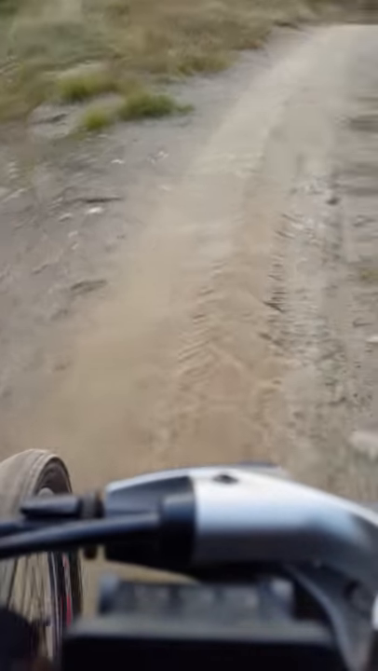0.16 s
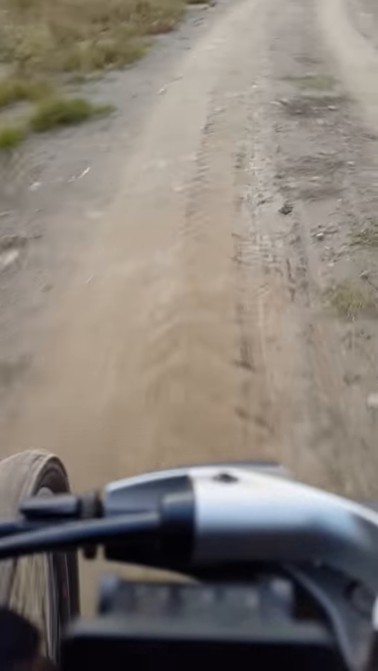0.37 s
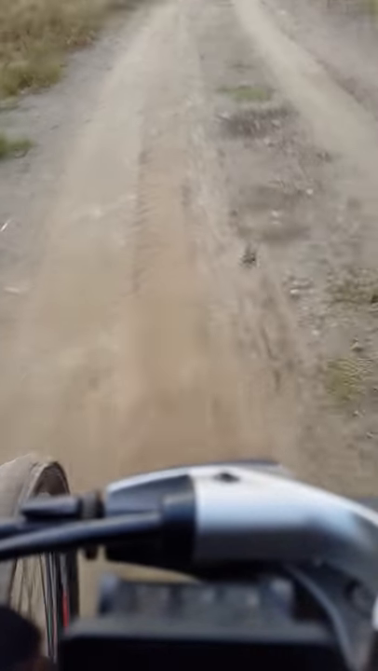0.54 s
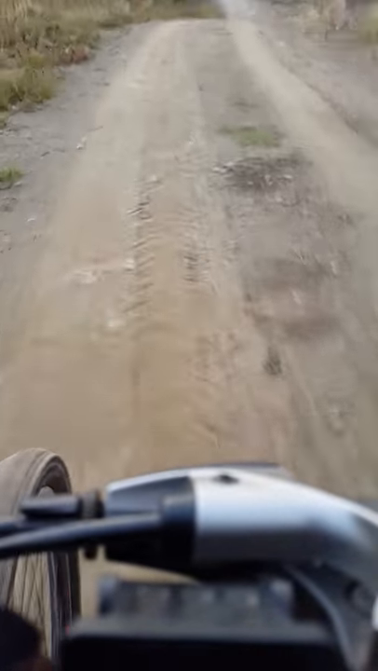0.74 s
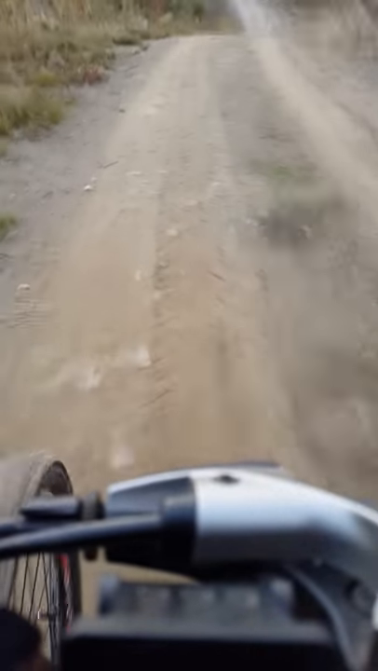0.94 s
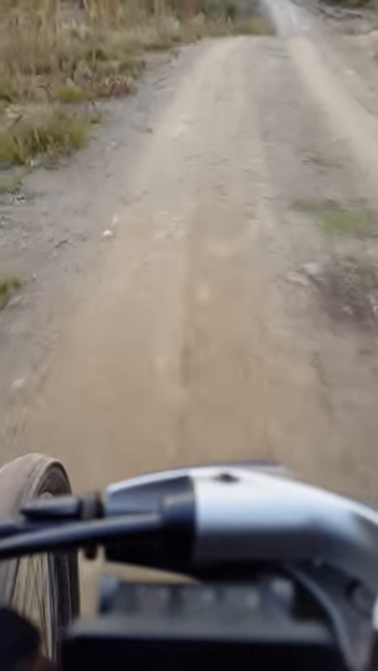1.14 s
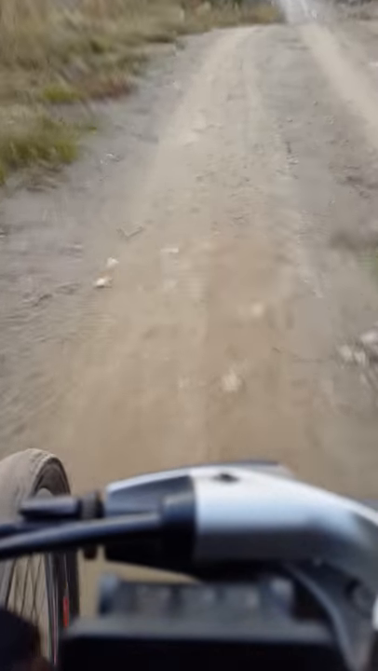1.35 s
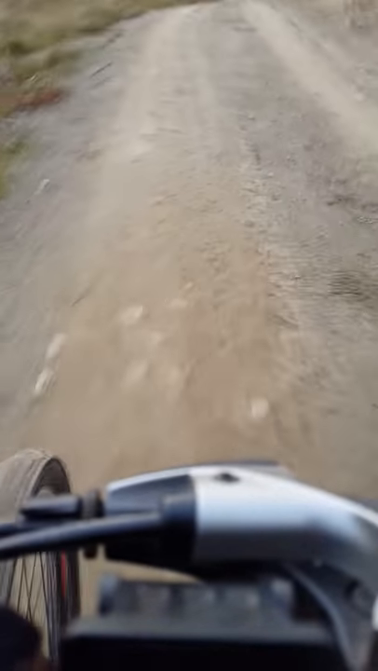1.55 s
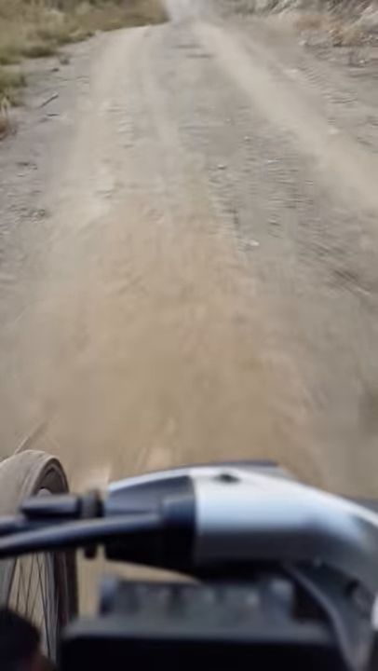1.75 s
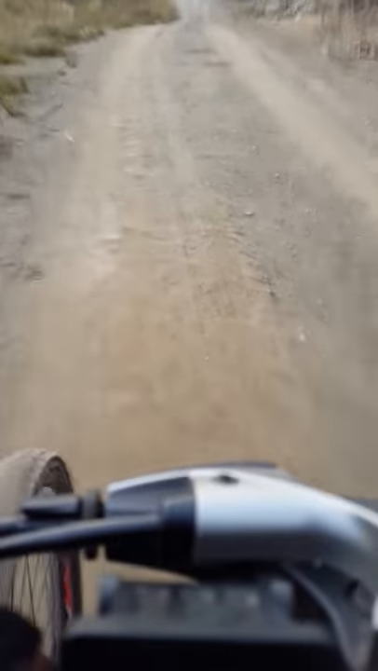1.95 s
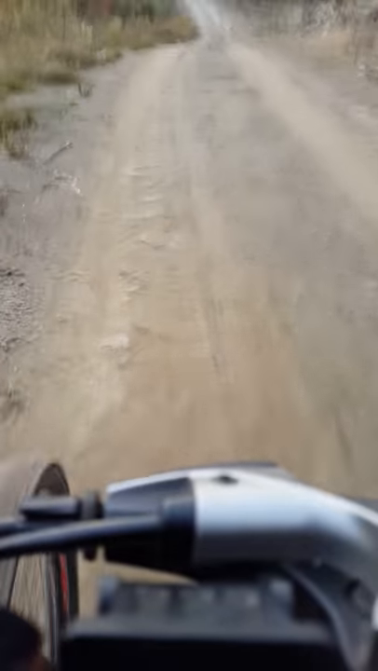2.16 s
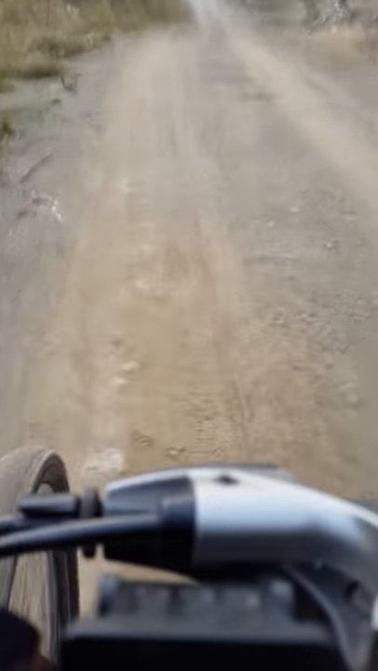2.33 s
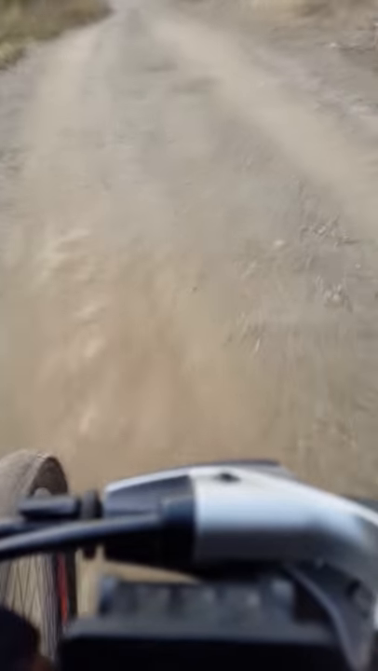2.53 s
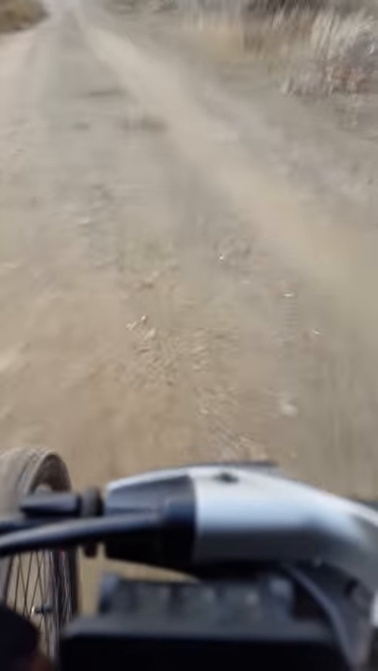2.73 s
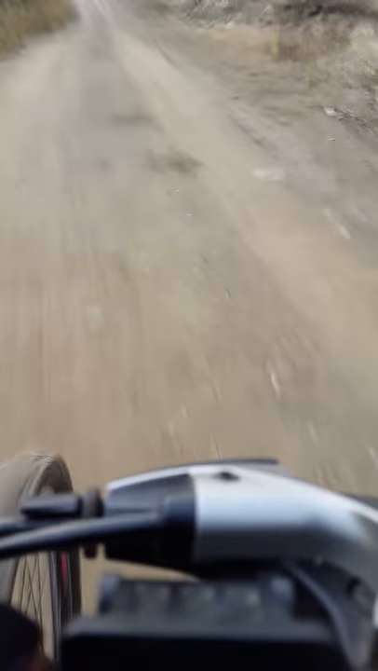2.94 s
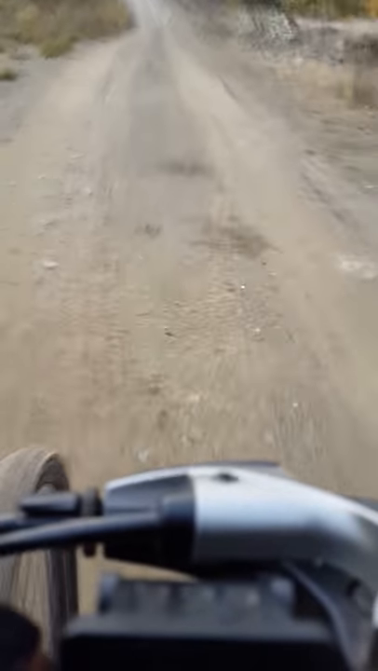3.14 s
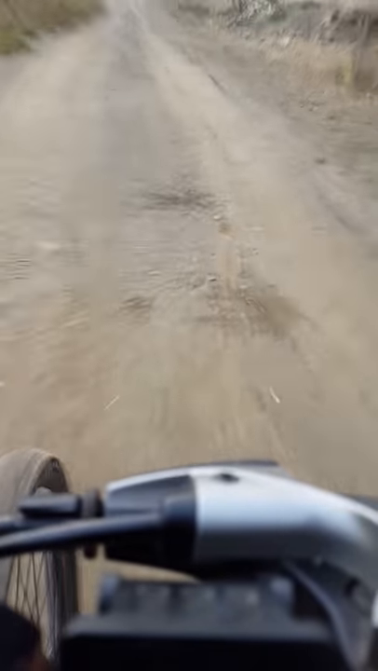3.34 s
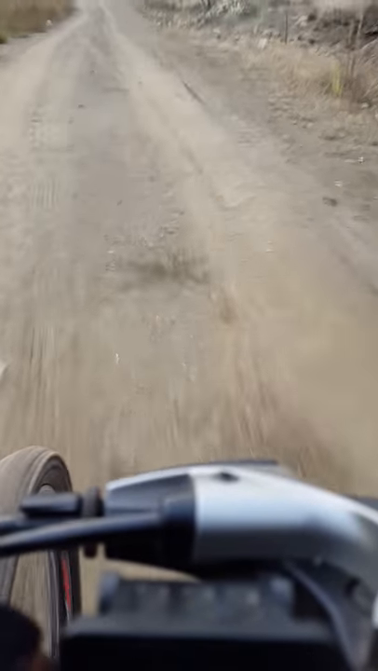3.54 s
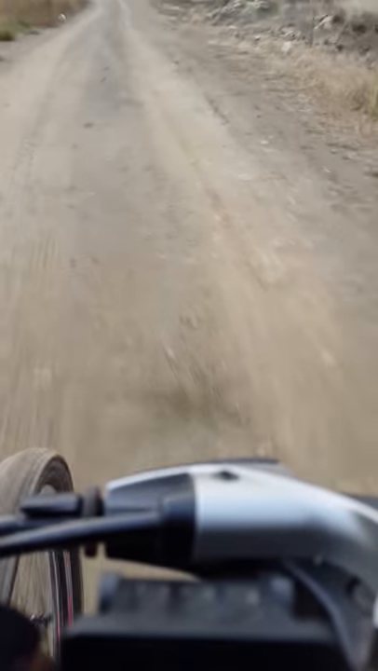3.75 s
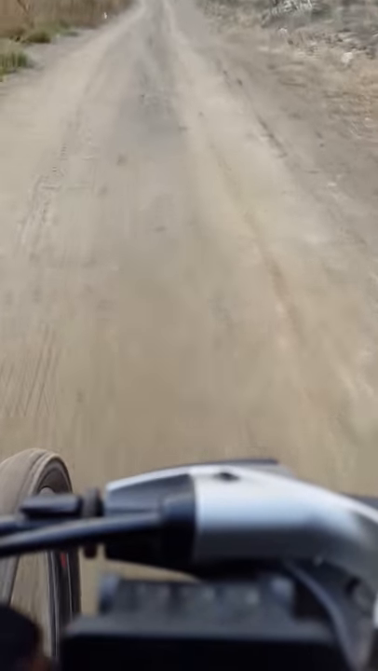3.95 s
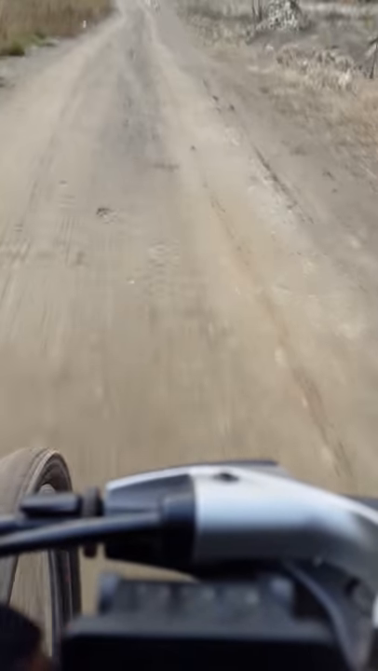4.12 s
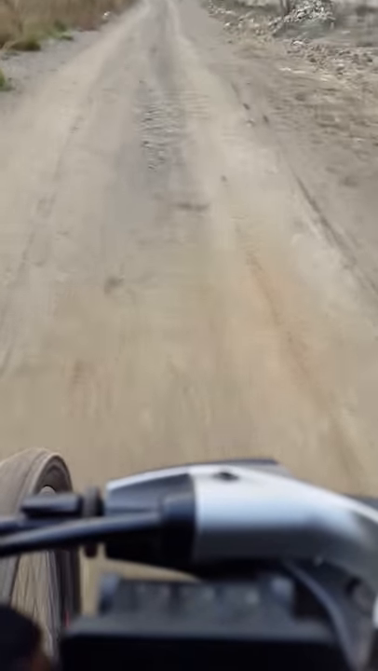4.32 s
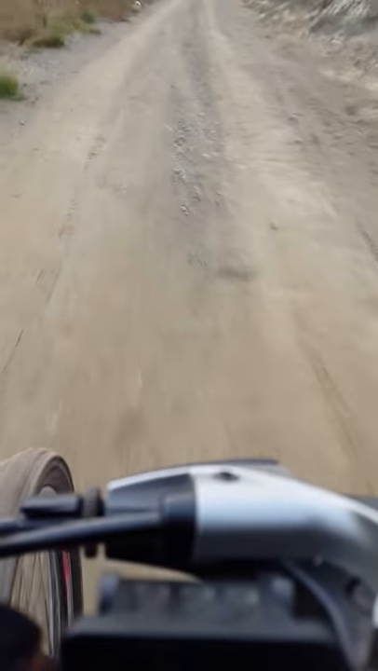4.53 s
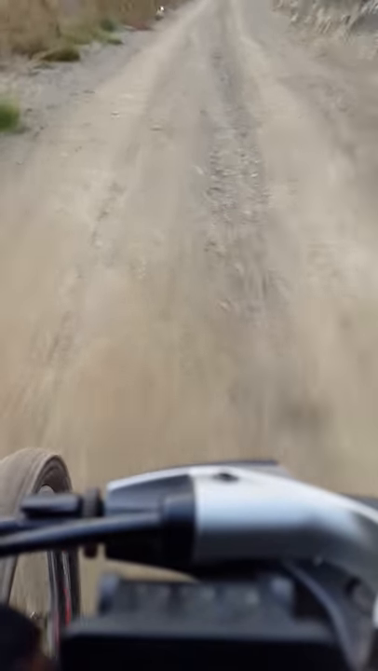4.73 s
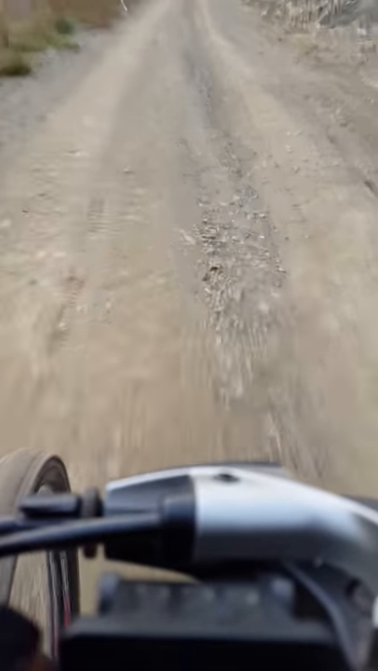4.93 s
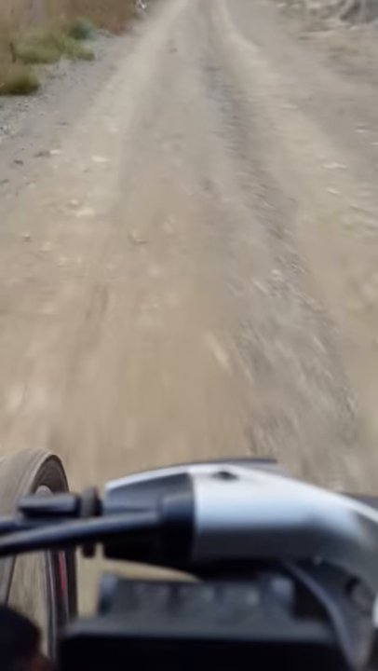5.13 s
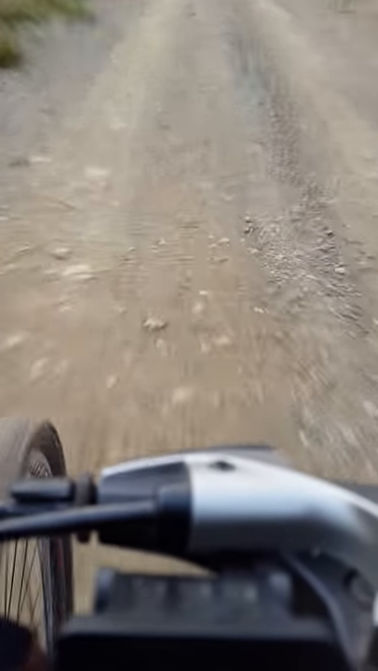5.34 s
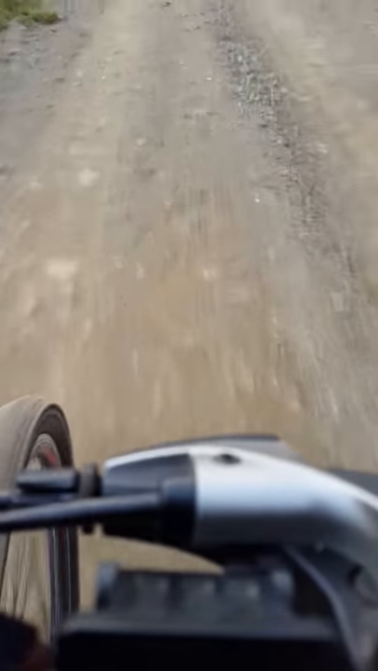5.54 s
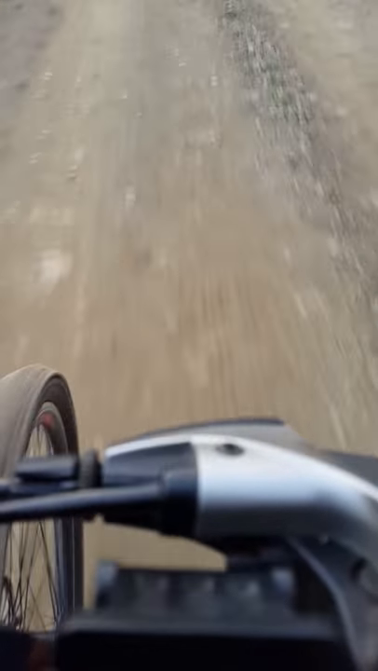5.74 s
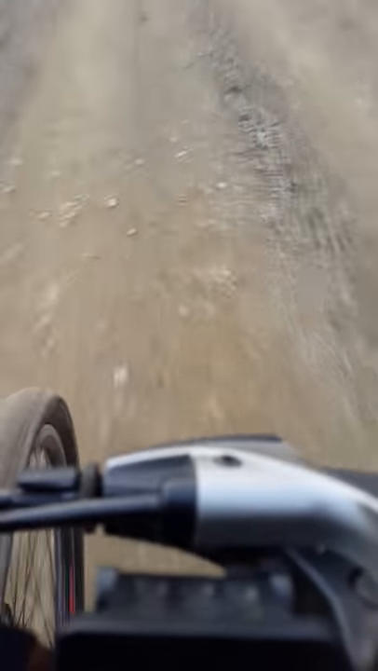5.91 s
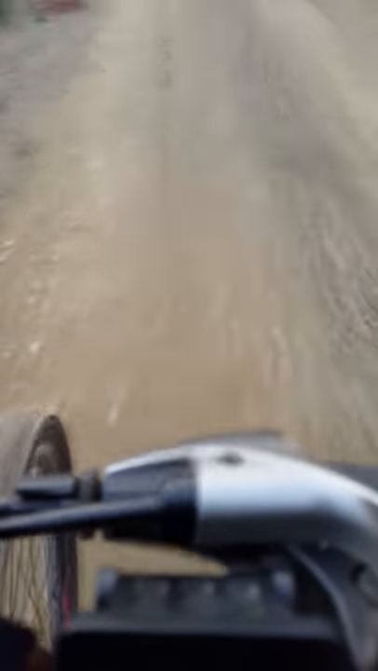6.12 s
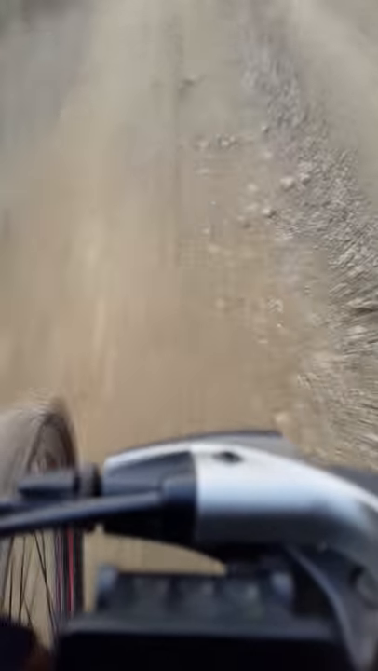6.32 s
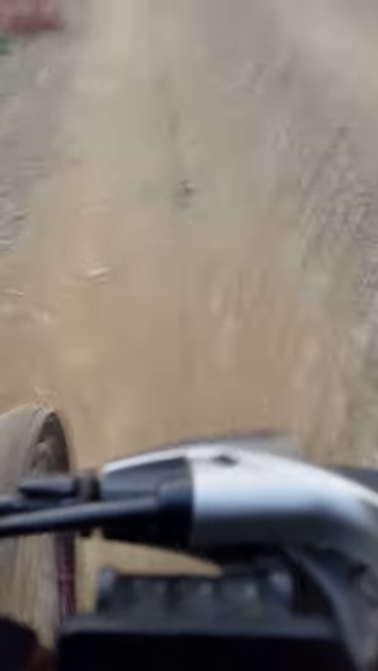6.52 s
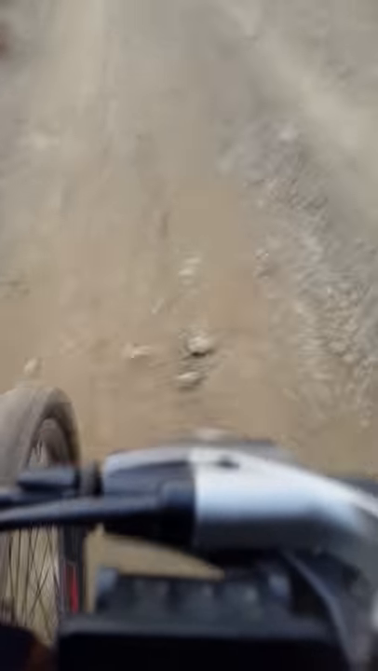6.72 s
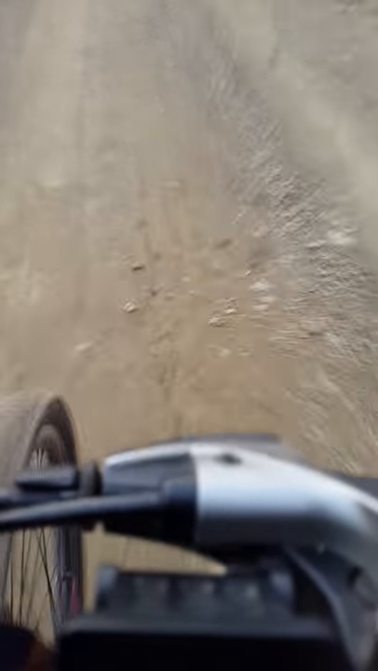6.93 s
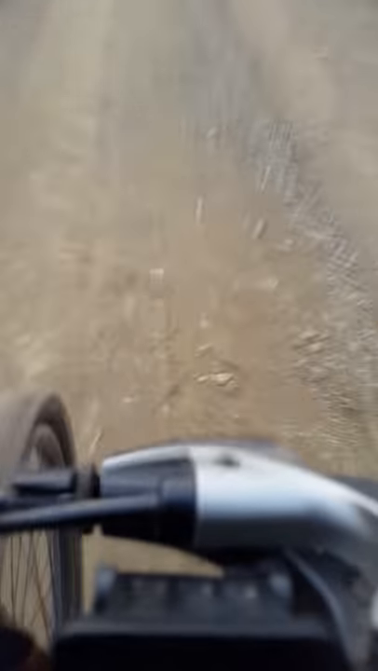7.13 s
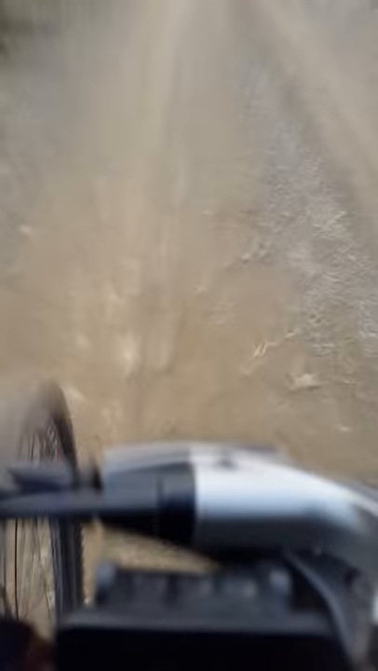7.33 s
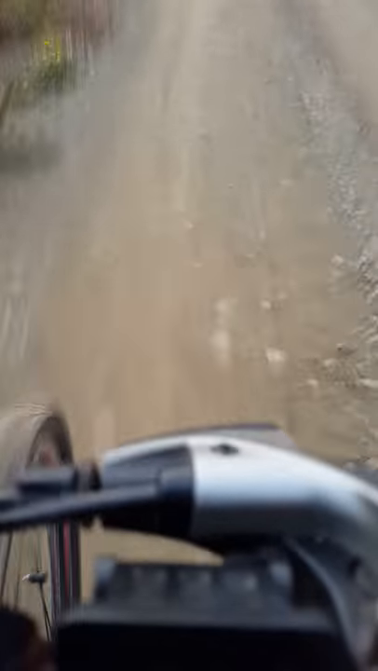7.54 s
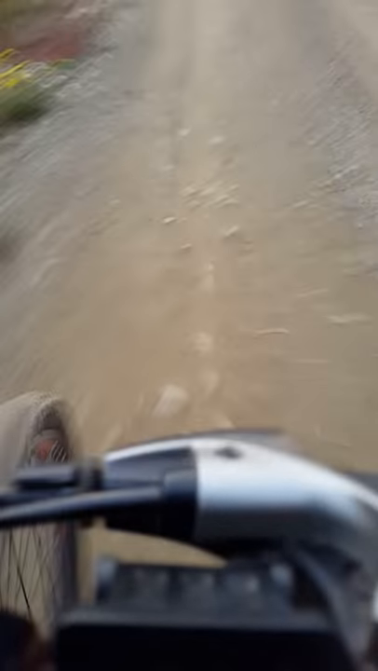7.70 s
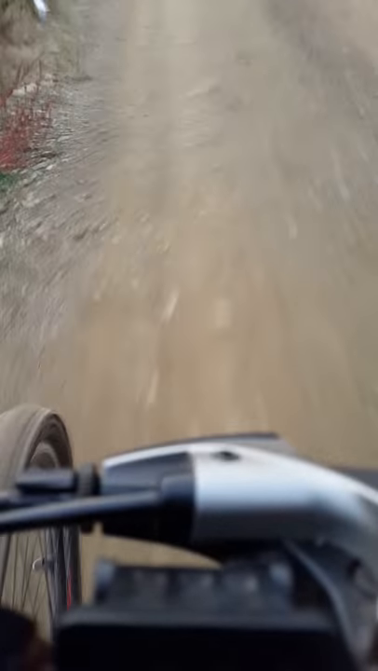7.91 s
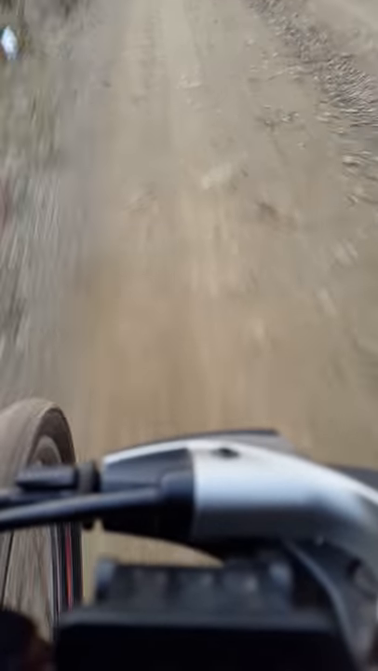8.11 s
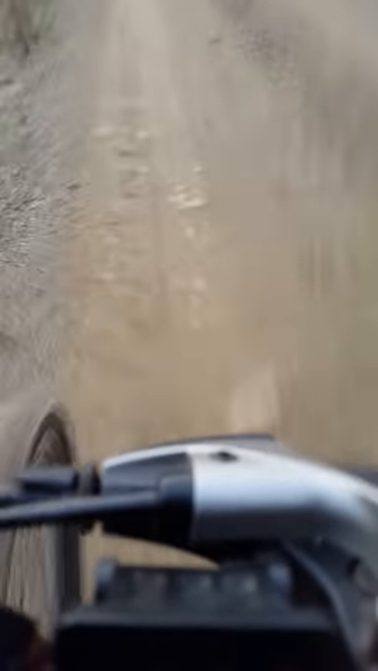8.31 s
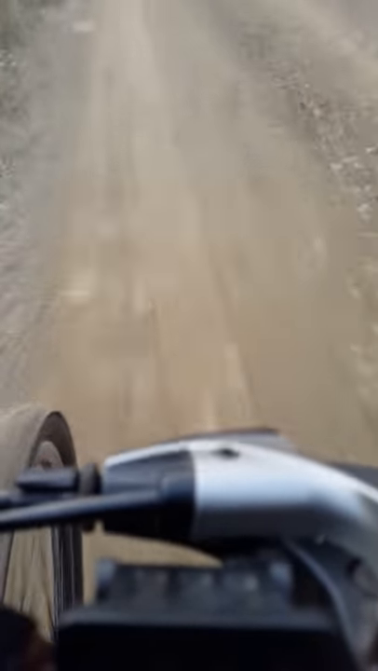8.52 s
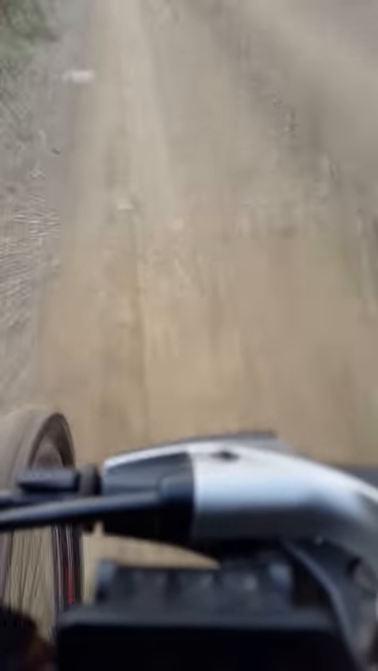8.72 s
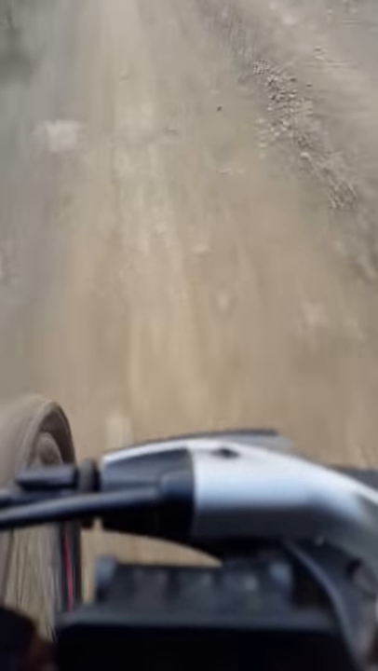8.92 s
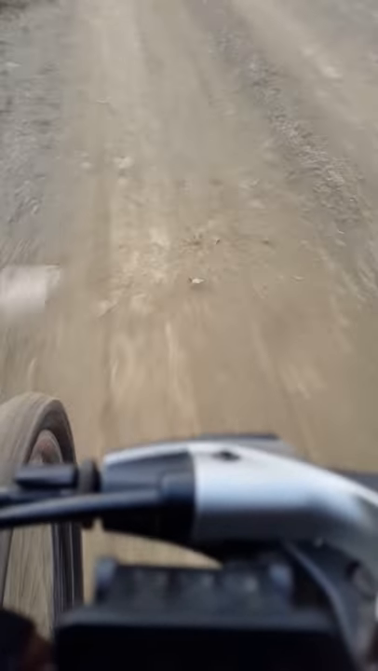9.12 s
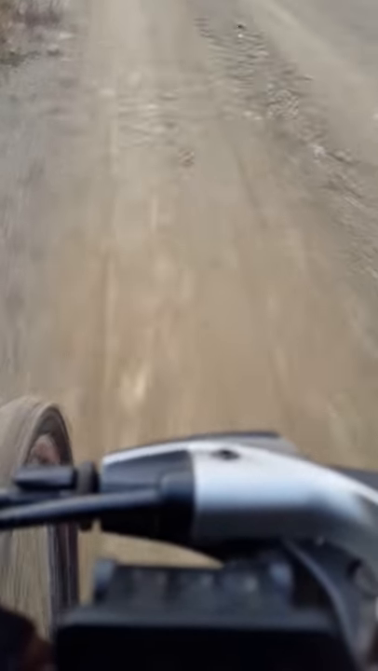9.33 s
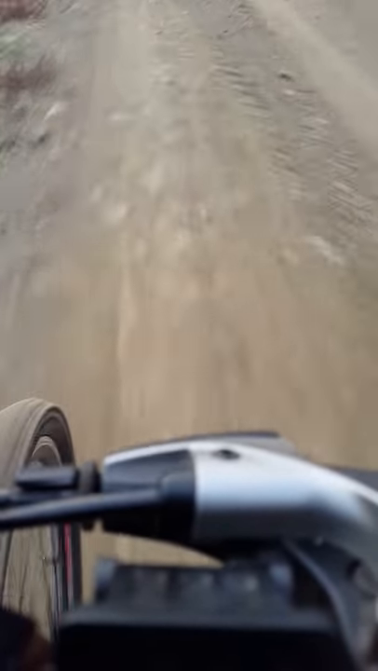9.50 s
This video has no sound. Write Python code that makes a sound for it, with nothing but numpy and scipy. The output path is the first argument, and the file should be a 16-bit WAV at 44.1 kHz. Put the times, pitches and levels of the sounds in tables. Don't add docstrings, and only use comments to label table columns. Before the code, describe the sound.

Wind buffets a handlebar microphone as a mountain bike gathers speed on a dirt track, tyres hissing, frame thudding, cables and levers rattling.

```python
import sys
import numpy as np
from scipy import signal
from scipy.fft import rfft, irfft
from scipy.io import wavfile
from scipy.ndimage import uniform_filter1d

SR = 44100
rng = np.random.default_rng(int(sys.argv[2]) if len(sys.argv) > 2 else 0)


def elevation(decibels):
    levels = np.asarray(decibels, float)
    return 10 ** (levels / 20)


def master_out(mix):
    frames = np.transpose(np.atleast_2d(mix))
    ceiling = np.clip(frames, -1, 1)
    pcm = np.round(ceiling * 32767).astype(np.int16)
    wavfile.write(sys.argv[1], SR, pcm)


N = 426006

# time in seconds, buffeting in dB, left over right in dB.
WIND_FLOW = [(0.0, -42.5, -19.5), (0.75, -52, 10.5), (0.94, -42, -0.5), (1.37, -28.5, 3), (2.1, -24, 8),
             (2.58, -26.5, 0.5), (3.61, -41, 9.5), (3.9, -30, 8), (4.81, -21, 9.5), (5.09, -24, -0.5),
             (5.6, -18, 18), (5.92, -20, 7), (6.62, -17, 2.5), (6.86, -14.5, 8), (7.07, -24, 7),
             (8.1, -31, 6.5), (8.8, -20.5, 10.5), (9.66, -15.5, 18)]
# frequency in Hz, density in dB per Hz.
BUFFET_SPECTRUM = [(12, -55), (20, -20), (68, -0.5), (120, 1), (172, -2.5), (213, 0), (323, -7), (367, -10),
                   (1080, -36.5), (1190, -38.5), (1500, -39.5), (1950, -43.5), (3300, -120)]
# middle in seconds, extra left over right in dB.
SIDE_GUSTS = [
    (2.03, 1),
    (4.81, 2.5),
    (4.98, 13),
    (5.5, 13),
    (5.87, 9),
]
# time in seconds, hiss in dB.
TREAD_LOAD = [(0.0, -59.5), (0.29, -65), (0.67, -70), (0.97, -66), (1.2, -56), (1.64, -50), (2.64, -47),
              (2.88, -59), (3.55, -63.5), (3.9, -53.5), (4.22, -42.5), (6.89, -42), (7.35, -55),
              (7.67, -48.5), (7.96, -59.5), (8.55, -46), (9.1, -48.5), (9.66, -44.5)]
# start in seconds,
# end in seconds, extra spray in dB.
SAND_PATCHES = [(1.1, 2.73, 2), (7.482, 7.505, 23), (7.533, 7.546, 21), (7.585, 7.6, 14),
                (7.609, 7.617, 13), (7.645, 7.68, 13), (8.728, 8.8, 7), (9.531, 9.573, 16.5),
                (4.06, 4.983, 6), (5.003, 6.522, 3), (7.832, 8.873, 7), (8.847, 9.687, 3),
                (9.295, 9.463, 8.5)]
# frequency in Hz, density in dB per Hz.
PORT_COLOUR = [(530, -39.5), (900, 38.5), (968, -9), (1340, -3), (1760, -2.5), (2350, -3), (3110, -2),
               (5860, -7), (6700, -11), (8150, -13), (9090, -20.5), (11300, -16.5), (15200, -19.5),
               (15900, -20), (16500, -56)]
# frequency in Hz, left over right in dB.
PORT_SHADE = [(60, -1.0), (130, 4.0), (290, 6.5), (640, 2), (1410, 16), (3100, 16), (6820, 23),
              (15000, 10.5)]
# start in seconds, peak in dB, knock in Hz, left over right in dB.
STONY_KNOCKS = [(4.645, -13, 370, 14), (4.794, -9.5, 336, 33), (5.163, -13, 404, 1), (5.219, -12.5, 420, 9),
                (5.457, -5.5, 305, 18), (5.506, -8, 412, 29), (5.559, -9.5, 517, 34),
                (6.028, -13.5, 525, 3), (6.069, -30, 314, -6), (6.133, -11.5, 286, -3), (6.538, -7, 327, 1),
                (6.592, -10.5, 426, 5), (6.673, -13, 336, 19), (6.861, -10, 390, 5), (6.988, -10, 460, -1),
                (7.205, -6.5, 347, 2), (7.258, -11.5, 326, 3), (7.43, -14, 316, 2), (7.297, -24, 330, 3),
                (7.48, -10.5, 352, 0), (7.788, -13, 299, 5), (8.466, -12.5, 325, 2), (8.605, -26, 305, 7),
                (8.816, -13, 368, 27), (9.289, -5.5, 362, 38), (9.601, -4.5, 326, 19), (7.599, -15, 310, 8),
                (7.645, -17.5, 260, 1), (7.669, -15, 310, -3), (7.826, -19, 266, 16),
                (7.902, -18.5, 260, 3), (8.884, -10, 270, 10), (9.518, -4.5, 241, 27),
                (8.341, -16.5, 299, 8), (8.404, -11, 243, 6)]
# start in seconds, peak in dB, knock in Hz, left over right in dB.
DIRT_BUMPS = [(0.063, -31, 417, -4), (0.192, -38, 580, 5), (0.307, -31, 348, 4), (1.118, -20.5, 440, 3),
              (1.506, -14, 372, -6), (1.811, -23.5, 296, -1), (1.945, -16.5, 315, -4),
              (2.054, -18.5, 296, 10), (2.102, -11, 467, 3), (2.298, -13, 310, 0), (2.465, -14, 290, -25),
              (2.556, -18, 301, -3), (2.659, -12, 468, 4), (2.686, -13, 297, -5), (2.737, -7, 310, 6),
              (2.903, -22, 290, 8), (2.948, -18, 316, -3), (3.236, -19.5, 318, 2), (3.394, -26, 348, 5),
              (3.455, -26, 398, 0), (3.546, -26, 296, -6), (3.96, -18, 417, 9)]
# start in seconds, peak in dB, knock in Hz, left over right in dB.
MORE_DIRT_BUMPS = [
    (0.3, -33.5, 420, 2),
    (0.41, -39.5, 503, 5),
    (0.33, -33.5, 295, 0),
    (0.495, -39.5, 300, 2),
    (0.46, -43, 300, 1),
    (9.056, -6, 270, 14),
    (8.512, -12.5, 300, 9),
    (2.655, -13, 110, -6),
    (2.743, -7, 116, 0),
]
# start in
# seconds, peak in dB, ring in Hz, left over right in dB.
SINGLE_STONES = [(0.2279, -38, 2724, 17.0), (2.688, -22, 1460, 4.0), (2.9098, -32, 2200, 15.5),
                 (5.3187, -26, 1420, 8), (5.3457, -33, 1740, 8.0), (5.3774, -27, 3270, 7.5),
                 (5.9631, -20, 3110, 8.5), (5.9924, -16, 2920, 6), (6.0484, -28, 1840, 3.5),
                 (6.0644, -15, 1200, 3), (6.1464, -24, 5930, 15.0), (6.2203, -26, 3450, 8.0),
                 (6.4183, -19, 1310, 10), (6.542, -19, 1410, 5.0), (6.6224, -19, 1340, 8),
                 (6.6512, -17, 1880, 7.5), (6.6854, -27, 1490, 15.5), (6.723, -24, 1610, 14.0),
                 (6.7815, -24, 1610, 11.0), (6.8019, -34, 2930, 15.0), (6.8324, -23, 2360, 2.5),
                 (6.8484, -26, 1350, 8.0), (6.8645, -16, 1640, 8.5), (6.8757, -11.5, 1450, -2),
                 (6.9451, -32, 2970, 15.5), (6.9524, -20, 1360, 9), (6.9654, -27, 1430, 5),
                 (7.2599, -24, 1200, 5.0), (7.2843, -24, 1260, 1), (7.442, -25, 1530, 6.5),
                 (7.4864, -21, 2410, 10.0), (7.4909, -16, 1920, -6), (7.5034, -21, 1970, 5),
                 (7.5205, -21, 1200, 11), (7.5254, -31, 1630, 5.0), (7.5434, -25, 1930, -5),
                 (7.6126, -28, 1380, 12.5), (7.6296, -32, 1220, 14.0), (7.643, -23, 1510, 4),
                 (7.673, -18, 1940, 7), (7.879, -31, 1810, 8.5),
                 (0.195, -37.5, 900, 9), (1.5084, -27, 1000, 4), (1.7142, -30, 1500, 9),
               (1.9465, -28, 1300, 8), (2.4704, -26, 14500, 20), (2.7394, -8, 3000, 6),
               (2.7865, -19, 15000, 16), (3.706, -49, 12000, 14), (3.7432, -41, 1800, 14),
               (3.8126, -42, 4200, 14), (4.81, -23.5, 900, 10), (5.736, -14, 14500, 12),
               (5.7408, -16.5, 2000, 12), (5.787, -22, 6000, 14), (6.508, -21, 4000, 12),
               (6.551, -23, 11000, 12), (6.8208, -22, 12500, 16), (6.9995, -19, 3000, 15),
               (7.0464, -22, 3700, 16), (7.1885, -22, 1800, 11), (7.4805, -24, 3000, 8),
               (7.4997, -14.5, 4100, -4), (7.705, -22, 890, -3), (8.373, -20.5, 1800, 14),
               (8.4065, -27, 1100, 4), (8.455, -33, 1500, 8), (8.5866, -20, 900, 8), (8.606, -22, 1300, 8),
               (8.7745, -25, 1210, 8), (8.9465, -23.5, 750, 16), (9.1675, -25, 800, 8),
               (9.185, -22, 1800, 10), (9.2345, -22, 750, 11), (9.2875, -27, 900, 18),
               (9.337, -18, 830, 17), (9.461, -27, 1300, 6), (9.5265, -21, 750, 20)]
# start in seconds, peak in dB, left over right in dB.
CABLE_SLAPS = [(0.189, -44, 3), (0.258, -33, 18), (0.9628, -37, 16), (1.5095, -25, 19), (1.9459, -27, 16),
               (2.2183, -19.5, 24), (2.268, -16, 25), (2.4925, -16, 5), (2.775, -10, 5), (2.8323, -23, 4),
               (2.9507, -18.5, 13), (3.5488, -32, 15), (5.1618, -25, -9), (5.2193, -17, 7),
               (6.0698, -1.5, 5), (6.1336, -8, 7), (6.251, -10.5, 8), (6.3103, -7.5, 14),
               (6.594, -10.5, 11), (6.6072, -8, 6), (7.2238, -3.5, 14), (7.3102, -11, -22),
               (7.4563, -11.5, 4), (7.4814, -15, 18), (7.5724, -15.5, 16), (7.7916, -20, 1),
               (7.816, -14, 18), (8.47, -18, 2), (9.6149, -18.5, -5)]
# start in seconds, peak in dB, left over right in dB.
LEVER_RATTLES = [(2.098, -23.5, 16), (2.7388, 1.5, 11), (2.8673, -28, 15), (5.2469, -23, 8),
                 (5.674, -18, 24), (5.9662, -5, 25), (6.0052, -3.5, 27), (6.017, -12, 10), (6.032, -11, 14),
                 (6.107, -10, 12), (6.2674, -5, 21), (6.3913, -14, 17), (6.6416, -6, 4), (6.8697, -13, -6),
                 (6.8892, -4, 12), (6.9919, -11, 20), (7.0062, -4.5, -33), (7.208, -12, -3),
                 (7.2967, -16, 5), (7.4933, -17, -10), (7.705, -12, 12), (7.9835, -23, 18),
                 (8.1255, -22, 18)]
# start in seconds, peak in dB, left over right in dB.
STONE_TICKS = [(2.471, -17, 7), (2.786, -10, 29), (4.168, -17, 16), (4.1233, -12.5, 10), (4.2739, -12, 23),
               (4.338, -13.5, 19), (4.5224, -23, 14.5), (4.57, -14, 19), (5.6185, -23, 12),
               (5.7801, -9, 20), (5.805, -11, 20), (5.81, -12, 20), (5.856, -14, 17), (5.861, -15.5, 17),
               (5.9837, -14, 0), (6.6759, -13.5, 14.5), (6.8213, -16.5, 33), (7.047, -15, 26),
               (7.1878, -13, 21), (7.371, -21, 14), (7.5394, -17.5, 11), (7.6597, -20, -4),
               (8.3722, -13.5, 25), (8.606, -20, 17), (8.8453, -19, 12.5), (9.176, -17, 11),
               (9.3397, -18, 16), (9.5724, -17, 15)]
# start in seconds, length in seconds, level in dB, left over right in dB.
GRAVEL_PATCHES = [(2.734, 0.035, -37, 15), (2.948, 0.027, -47.5, 11), (5.153, 0.041, -28.5, 13),
                  (5.214, 0.04, -32, 13), (5.247, 0.048, -32, 11), (5.34, 0.068, -34.5, 12),
                  (5.976, 0.16, -32.5, 6), (6.062, 0.016, -27, 9), (6.602, 0.094, -36.5, 20),
                  (6.866, 0.031, -31.5, 5), (6.988, 0.028, -28, 9), (7.198, 0.055, -36, 15),
                  (7.261, 0.078, -39.5, 5), (7.489, 0.023, -26.5, 7), (7.525, 0.071, -40.5, 5),
                  (8.363, 0.071, -43, 9), (1.577, 0.032, -41, 13), (1.623, 0.036, -43, 15),
                  (1.716, 0.012, -41, 9), (2.124, 0.23, -46.5, 13), (8.546, 0.1, -42, 11),
                  (9.17, 0.079, -41, 12), (7.811, 0.035, -38.5, 12), (5.513, 0.043, -42, 20)]
# frequency in Hz, density in dB.
GRAVEL_SPECTRUM = [(300, -29), (700, 5.5), (1200, -2), (2000, -3), (4000, -7.5), (5500, -17), (9000, -27.5)]
# middle in seconds, length in seconds, level in dB, brightness in dB,
# left over right of the top in dB.
FORK_STROKES = [
    (0.346, 0.26, -49, 1, 0),
    (3.245, .22, -48.5, 1, -2),
    (4.276, 0.19, -43, 19, 16),
]
# frequency in Hz, level in dB, 60 dB decay time in seconds.
SPOKE_MODES = [
    (5900, 3, 0.014),
    (6160, -4, 0.023),
    (9960, -7, 0.014),
    (12450, -2, 0.011),
    (14700, -4, .007),
]
# start in seconds, level in dB, left over right in dB.
SPOKE_HITS = [
    (5.618, -17.5, 32),
]
# frequency in Hz, level in dB, 60 dB decay time in seconds.
TUBE_MODES = [
    (875, -1, 0.025),
    (1210, 0, 0.035),
    (1710, 0, 0.016),
    (3320, -19, 0.028),
]
# start in seconds, level in dB, left over right in dB.
TUBE_HITS = [
    (6.0688, -16, 3),
    (7.226, -37, 9),
]

ROAR_DB = -13
HUM_DB, HUM_SLOPE = -6.5, -0.14
GUST_S = 0.066
SHARED = 0.55
LAG_S = 0.00043
SPRAY_DB, SPRAY_SLOPE = -68, 1.32
SAND_EDGE_S = 0.04
DULL_DB = 1
HISS_EDGE_HZ = 15800
STEM_HZ, STEM_DB, STEM_S = 776, -14.5, 0.0053
DIRT_BOOM_DB, STONE_BOOM_DB = 0.5, -8.5
BOOM_TOP_DB = -14
CLACK_S, CLACK_WIDE, CLACK_TOP_DB = 0.0014, 7.5, -26
SLAP_TOP_DB, RATTLE_TOP_DB, TICK_TOP_DB = -35, -23, -12


def evened(x):
    return x / np.sqrt(np.mean(x ** 2) + 1e-20)


def read(points, hz):
    f, value = np.transpose(points)
    return np.interp(np.log(hz + 1), np.log(f + 1), value)


def hump(x, centre, width):
    return np.exp(-((x - centre) / width) ** 2)


def ramp(x, start, width):
    return np.clip((x - start) / width, 0, 1)


def ports(pan_db):
    return 2 / np.sqrt(1 + elevation(2 * np.array([-pan_db, pan_db])))


def shaded(hz, pan_db, slope_db):
    octaves = np.clip(np.log2(hz / 2500 + 0.01), -1.5, 1.3)
    return ports(pan_db + slope_db * octaves - 2.1 * (hz > 10000))


def add(mix, s, sound):
    part = mix[:, max(round(s * SR), 0):][:, :sound.shape[1]]
    part += sound[:, :part.shape[1]]


def frames_and_bins(size):
    hop = size // 4
    return np.arange(N // hop + 5) * hop / SR, np.fft.rfftfreq(size, 1 / SR)[:, None]


def band(colour_db, hz, lo, hi):
    gain = elevation(colour_db)
    return gain / np.sqrt(np.sum(gain[(hz > lo) & (hz < hi)] ** 2))


def noise(gain, size):
    a, b = rng.standard_normal((2,) + gain.shape)
    return signal.istft((a + 1j * b) * gain, nperseg=size, noverlap=size - size // 4)[1][:, :N] * 0.84


def flutter(shape, frames):
    return evened(uniform_filter1d(rng.standard_normal(shape), max(round(frames), 1), -1))


def click(burst, colour, hz, pan_db, slope_db):
    spectrum = rfft(np.roll(burst, 40, -1)) * colour
    peak = abs(irfft(spectrum)).max(1, keepdims=True)
    return irfft(spectrum * shaded(hz, pan_db, slope_db)) / peak


def wind():
    t, hz = frames_and_bins(512)
    sample_s, lag = np.arange(N) / SR, round(LAG_S * SR)
    s, *columns = np.transpose(WIND_FLOW)
    level_db, pan_db = (np.interp(t, s, c) for c in columns)
    pan_db = pan_db + sum(db * hump(t, at, GUST_S) for at, db in SIDE_GUSTS)
    roar_db = ROAR_DB - 0.078 * (level_db + 25)
    hum_db = HUM_DB + HUM_SLOPE * (level_db + 26)

    high = np.clip(np.log(hz / 180 + 1e-9) / np.log(3), 0, 1)
    lumps_db = 1.7 * np.minimum(flutter((2, 1, len(t)), 9), 1.8)
    colour = band(read(BUFFET_SPECTRUM, hz), hz, 40, 300)
    colour = colour * elevation(level_db + lumps_db) * ports(pan_db)[:, None]
    pops = (rng.random((2, N)) < 60 / SR) * np.minimum(rng.exponential(1, (2, N)), 1.8)
    pops = signal.lfilter([1], [1, -np.exp(-1 / (0.0037 * SR))], pops)
    roar = noise(colour * high * elevation(roar_db + 11.5), 512)
    roar = roar * (1 + 1.93 * uniform_filter1d(pops, 40, -1))
    bass = noise(colour * (1 - high), 512)
    bass = bass * (1 + 0.79 * uniform_filter1d(pops, 220, -1))

    t_long, hz = frames_and_bins(2048)
    modes = elevation(-8) / (1 + ((hz - 82) / 14) ** 2) + elevation(-4) / (1 + ((hz - 148) / 30) ** 2)
    hum = noise(modes[None] / np.linalg.norm(modes) * np.ones(len(t_long)), 2048)[0]
    hum = hum * elevation(np.interp(sample_s, t, level_db + hum_db + lumps_db[1, 0]))

    air = bass + roar
    swing = SHARED * np.sign(uniform_filter1d(lumps_db[0, 0] - lumps_db[1, 0], size=160))
    swept = np.roll(air[0], lag) * np.interp(sample_s, t, swing * elevation(-pan_db))
    air[1] = np.sqrt(1 - SHARED ** 2) * air[1] + swept
    return air + np.array([0.64 * hum, 2.32 * np.roll(hum, lag)])


def tyre():
    t, hz = frames_and_bins(128)
    grit_db = np.interp(t, *np.transpose(TREAD_LOAD))
    sand_db = np.zeros(len(t))
    for start, end, db in SAND_PATCHES:
        edge_s = min(SAND_EDGE_S, (end - start) / 4)
        sand_db += db * np.clip(np.minimum(t - start, end - t) / edge_s + 0.5, 0, 1)
    spray_db = SPRAY_DB + SPRAY_SLOPE * (grit_db + 51.5) + sand_db

    colour_db = read(PORT_COLOUR, hz) - 60 * (hz < 600) - hump(hz, 8800, 1300)
    colour_db = colour_db + 3 * hump(hz, 4200, 500) + 3.3 * hump(hz, 6000, 450)
    dull_db = DULL_DB * np.minimum(grit_db + 45, 0) * ramp(hz, 6300, 1500)
    dull_db = dull_db + 0.62 * np.minimum(grit_db + 56, 0) * ramp(hz, 2500, 2500)
    body = band(colour_db - 60 * (hz > 9000), hz, 1500, 7000) * elevation(grit_db + dull_db)
    top_db = colour_db - 60 * (hz < 9000) - 9 * np.clip((11200 - hz) / 1500, 0, 1)
    top = band(top_db, hz, 10300, 16000) * elevation(spray_db)

    stones = (rng.random((2, len(t))) < [[0.08], [0.05]]) * np.minimum(rng.exponential(1, (2, len(t))), 2.5)
    crackle = uniform_filter1d(elevation(4.6 * stones) - 1, 3, -1) * [[1.5], [2.5]]
    wobble = elevation(2.01 * flutter((2, len(t)), 30))
    body = body * elevation(2.36 * flutter(body.shape, 40))
    top_crackle = (2.5 * crackle[0] + crackle[1]) * elevation(0.5 * np.minimum(spray_db + 56, 0))
    grit = body * (wobble[0] + crackle[0]) + top * (wobble[1] + top_crackle)
    return noise(ports(read(PORT_SHADE, hz) + 0.11) * grit, 128)


def thuds():
    out, t = np.zeros((2, N)), np.arange(5000) / SR - [[0], [LAG_S]]
    kinds = (DIRT_BUMPS, DIRT_BOOM_DB), (STONY_KNOCKS, STONE_BOOM_DB), (MORE_DIRT_BUMPS, DIRT_BOOM_DB)
    rows = [(*row, boom_db) for table, boom_db in kinds for row in table]
    start = (t > 0) * (1 - np.exp(-t / 0.00081))
    for (s, db, hz, pan_db, boom_db), (sign, low, high) in zip(rows, rng.random((len(rows), 3))):
        glide = 1 + 0.5 * np.exp(-t / 0.0029)
        knock = np.exp(-t / 0.0046) * np.sin(2 * np.pi * hz * t * glide)
        stem_hz = STEM_HZ * (0.821 + 0.378 * high)
        knock = knock + elevation(STEM_DB) * np.exp(-t / STEM_S) * np.sin(2 * np.pi * stem_hz * t)
        boom = np.sin(2 * np.pi * (80 + 30 * low) * t)
        boom = boom + 0.69 * np.sin(2 * np.pi * (140 + 60 * high) * t)
        boom = elevation(min(db + boom_db - 0.5, BOOM_TOP_DB)) * np.exp(-t / 0.026) * boom
        swing = start * (elevation(db + 1.5) * knock + boom)
        right = 1 if sign > 0.5 or db > -12 else -1
        add(out, s + 0.0011, swing * ports(1.03 * pan_db)[:, None] * [[0.7], [right]])
    return out


def clacks():
    out, t, hz = np.zeros((2, N)), np.arange(512) / SR, np.fft.rfftfreq(512, 1 / SR)
    rows = SINGLE_STONES
    top = band(read(PORT_COLOUR, hz) - 40 * (hz < 8500), hz, 9200, 16000) * elevation(CLACK_TOP_DB)
    for (s, db, ring_hz, pan_db), burst in zip(rows, rng.standard_normal((len(rows), 2, 512))):
        edge_hz = 16800 if ring_hz > 10000 else 15900
        body_db = np.maximum(-CLACK_WIDE * np.log2(hz / ring_hz + 0.01) ** 2, -32)
        body_db = body_db - 14 * hump(hz, 9200, 1200) - 60 * (hz > edge_hz)
        colour = band(body_db, hz, 600, 17000) + top
        burst = burst * np.exp(-t / CLACK_S * min(ring_hz / 1400, 1))
        add(out, s - 0.0009, elevation(db - 1) * click(burst, colour, hz, pan_db + 4.5, slope_db=4) * 0.69)
    return out


def rattles():
    out, t, hz = np.zeros((2, N)), np.arange(512) / SR, np.fft.rfftfreq(512, 1 / SR)
    kinds = (CABLE_SLAPS, SLAP_TOP_DB), (LEVER_RATTLES, RATTLE_TOP_DB), (STONE_TICKS, TICK_TOP_DB)
    rows = [(*row, top_db) for table, top_db in kinds for row in table]
    top_colour = band(read(PORT_COLOUR, np.minimum(hz, 15200)) - 40 * (hz < 8500), hz, 9000, 12200)
    for (s, db, pan_db, top_db), burst in zip(rows, rng.standard_normal((len(rows), 2, 513))):
        bright = np.clip((top_db + 26.5) / 25, 0, 1)
        ring_hz = (1700 + 2100 * np.sqrt(bright)) * elevation(2.14 * burst[0, -1])
        decay_s = 0.0017 - 0.0012 * bright
        burst = burst[:, :-1] * (1 - np.exp(-t / 0.0002)) * np.exp(-t / decay_s)
        body_db = 1.1 / (1 + ((hz - ring_hz) / 300) ** 2) - 5.4 * np.log2(hz / ring_hz + 0.018) ** 2
        body = band(np.maximum(body_db, -30) - 25 * (hz > 8500), hz, 1200, 9200)
        colour = (body + top_colour * elevation(top_db + 3.5)) * (hz < HISS_EDGE_HZ)
        add(out, s - 0.0012, elevation(db - 6.5) * click(burst, colour, hz, pan_db, slope_db=10.5) * 0.73)
    return out


def crunch():
    t, hz = frames_and_bins(128)
    grains = elevation(4.5 * np.minimum(flutter(len(t), 2), 2))
    gain = np.zeros((2, len(hz), len(t)))
    for s, length, db, pan_db in GRAVEL_PATCHES:
        u = ramp(t, s, length)
        gain += shaded(hz, pan_db, slope_db=9) * elevation(db) * np.minimum(70 * u, 1) * np.sqrt(1 - u)
    return noise(gain * grains * band(read(GRAVEL_SPECTRUM, hz), hz, 500, 5000), 128)


def damper():
    t, hz = frames_and_bins(256)
    colour_db = read(PORT_COLOUR, np.maximum(hz, 1500)) - 30 * (hz < 300)
    colour_db = colour_db - 4 * np.log2(np.maximum(2500 / (hz + 1), 1))
    colour_db = colour_db + 7 * hump(hz, 700, 400) + 4 * hump(hz, 5500, 600) + 3 * hump(hz, 3500, 500)
    colour = band(colour_db, hz, 1500, 7000)
    gain = np.zeros((2, len(hz), len(t)))
    for s, length, db, bright_db, pan_db in FORK_STROKES:
        swell = np.cos(np.pi * np.clip((t - s) / length / 1.3, -0.5, 0.5)) ** 2.5
        tilt_db = bright_db * ramp(hz, 8500, 2500) - 21 * hump(hz, 9000, 1500)
        gain += ports(np.where(hz > 10000, pan_db, 14.0)) * colour * elevation(db + tilt_db) * swell
    return noise(gain, 256)


def ping():
    out, t = np.zeros((2, N)), np.arange(1500) / SR
    for modes, hits in (SPOKE_MODES, SPOKE_HITS), (TUBE_MODES, TUBE_HITS):
        ring = sum(elevation(db - 60 * t / t60) * np.sin(2 * np.pi * hz * t) for hz, db, t60 in modes)
        ring = ring * (1 - np.exp(-t / 0.00024))
        for s, db, pan_db in hits:
            add(out, s, elevation(db) * ring * ports(pan_db)[:, None] * 0.68)
    return out


def scene():
    air = wind()
    hiss = tyre() + crunch() + damper()
    hiss = signal.oaconvolve(hiss, signal.firwin(255, HISS_EDGE_HZ, fs=SR)[None], "same")
    return air + hiss + thuds() + clacks() + rattles() + ping()


def band_limit(x):
    return signal.sosfilt(signal.butter(12, 16970, fs=SR, output="sos"), x)


def record(dry):
    faded = dry * np.minimum(np.arange(N) / 150, 1)
    cut = signal.sosfilt(signal.butter(4, 56, "high", fs=SR, output="sos"), faded)
    soft = np.tanh(cut * 1.294) / 1.115
    mix = signal.oaconvolve(soft, signal.firwin(255, 16850, fs=SR)[None], "same")
    return band_limit(mix)


dry = scene()
out = record(dry)
master_out(out)
```